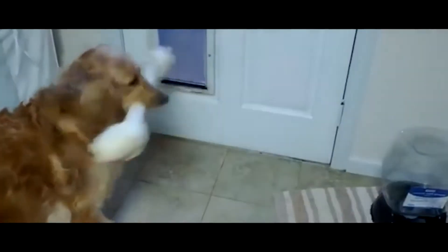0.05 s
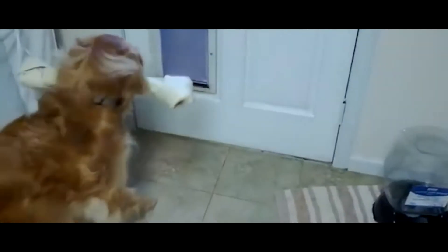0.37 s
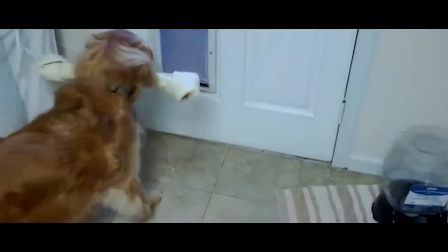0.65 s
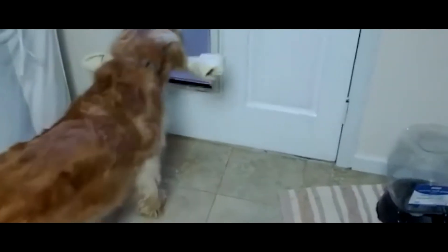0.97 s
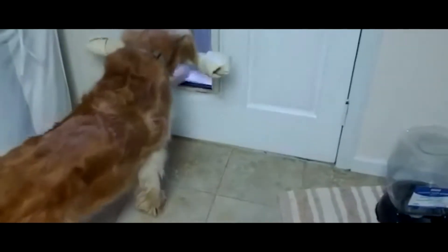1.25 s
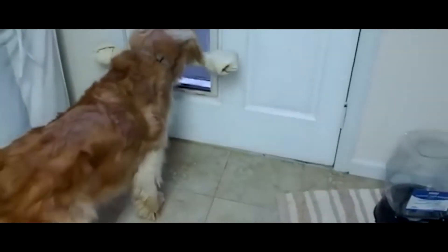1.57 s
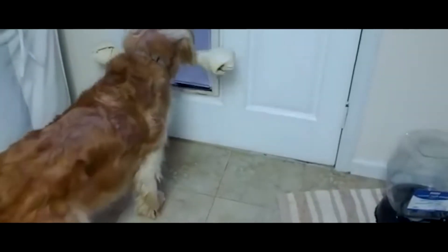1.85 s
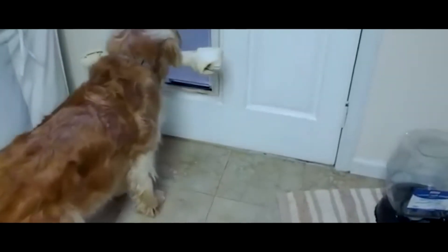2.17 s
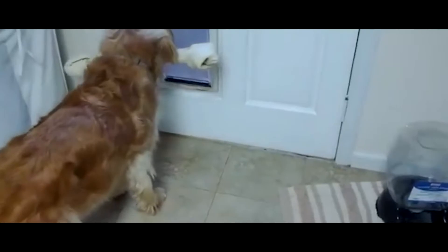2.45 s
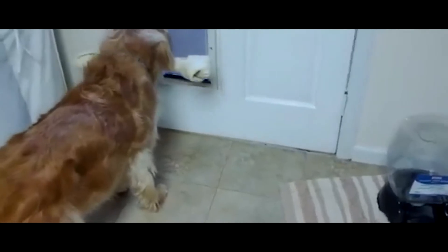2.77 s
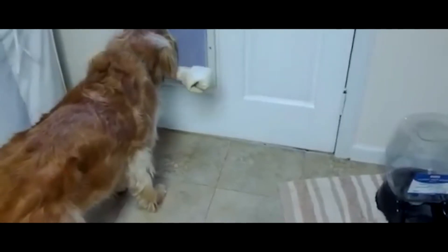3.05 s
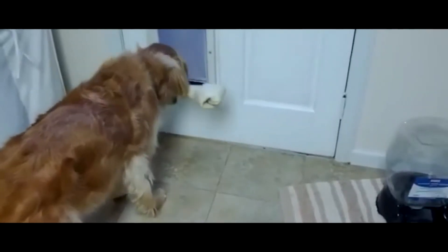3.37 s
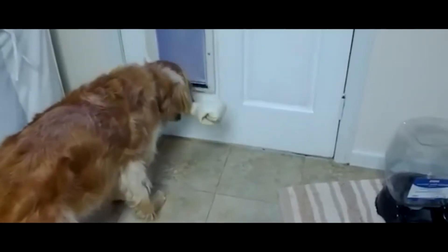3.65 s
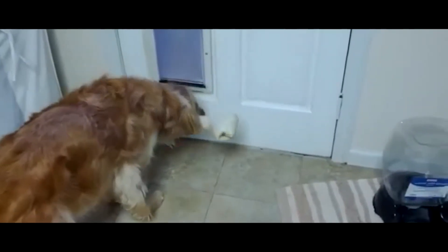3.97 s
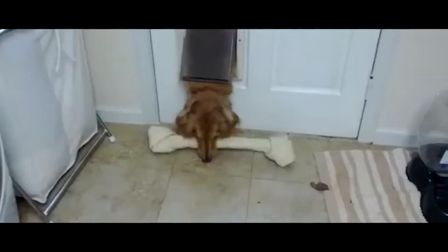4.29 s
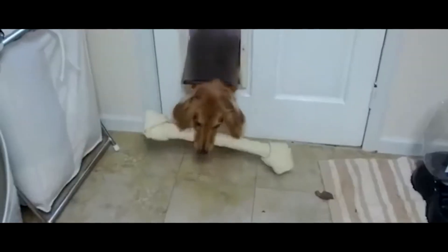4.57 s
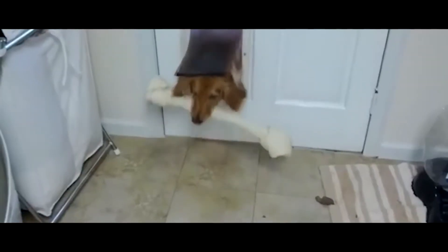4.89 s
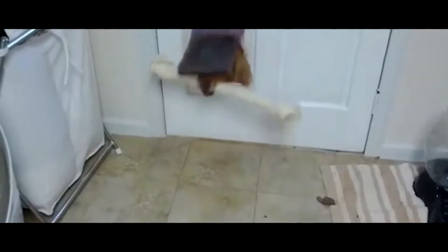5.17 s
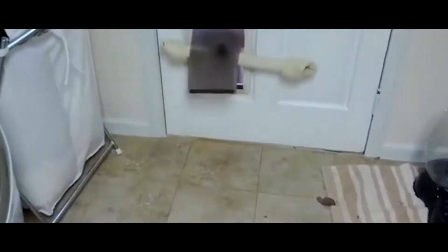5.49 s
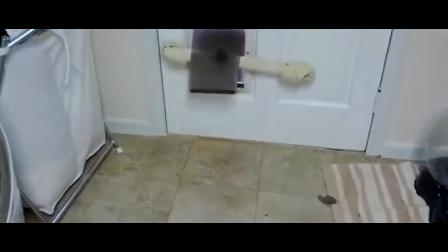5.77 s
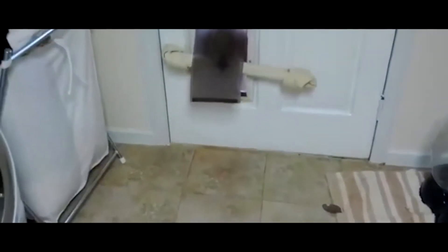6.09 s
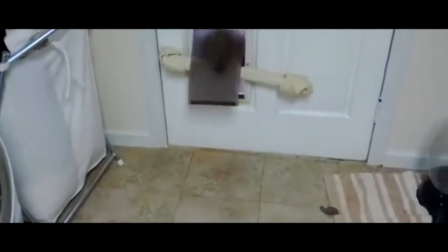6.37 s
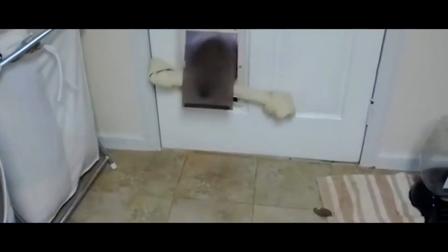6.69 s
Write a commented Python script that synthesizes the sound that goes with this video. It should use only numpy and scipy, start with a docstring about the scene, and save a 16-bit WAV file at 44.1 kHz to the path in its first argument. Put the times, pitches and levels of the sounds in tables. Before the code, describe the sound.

Light knocks, flap crinkles and claw ticks as a dog takes a bone through a pet door, then the bone bangs hard against the door.

```python
"""Dog with a bone at a pet door

A dog with a long chew bone in its mouth tries to get through a pet door in a small tiled room.
The plastic flap buckles and rustles. The bone knocks on the hollow door, exciting its modes, scrapes
along it by stick-slip friction and finally slams across the opening. Claws tick on the tiles and
metal collar tags ring over a quiet household rumble."""
import sys
import numpy as np
from scipy import signal
from scipy.fft import rfft, irfft, next_fast_len
from scipy.io import wavfile

SR = 44100
rng = np.random.default_rng(int(sys.argv[2]) if len(sys.argv) > 2 else 0)


def generate_wav(sig):
    """Save sig (samples, or channels by samples) to the path in sys.argv[1] as 16-bit PCM at SR."""
    pcm = np.round(np.clip(np.atleast_2d(sig).T, -1, 1) * 32767).astype(np.int16)
    wavfile.write(sys.argv[1], SR, pcm)


N = 296793
TIME = np.arange(N) / SR
AGE = TIME[:SR * 9 // 20]  # t/s since the onset of one event


def undb(db):
    """Amplitude ratio of a level in decibels."""
    return 10 ** (np.asarray(db) / 20)


def unit(x):
    """Normalisation to rms 1."""
    return x / np.sqrt(np.mean(x ** 2))


def struck(x):
    """Normalisation of a transient to rms 1 over its first 20 ms."""
    return x / np.sqrt(np.mean(x[:SR // 50] ** 2))


def fade(t60):
    """Exponential decay, 60 dB in t60 seconds."""
    return np.exp(-np.log(1000) * AGE / t60)


def onset(rise):
    """Linear growth to 1 in rise seconds."""
    return np.minimum(AGE / rise, 1)


def swell(rise, t60):
    """Linear growth followed by exponential decay."""
    return np.interp(AGE - rise, AGE, fade(t60)) * onset(rise)


def after(s, t60):
    """Delayed decay over the whole scene: 1 until time s, then 60 dB down every t60 seconds."""
    return np.exp(-np.log(1000) * np.maximum(TIME - s, 0) / t60)


def band(x, hz, q):
    """A two-pole resonance of quality factor q."""
    return signal.lfilter(*signal.iirpeak(hz, q, fs=SR), x)


def steep_band(x, hz, q):
    """Two equal resonances in cascade."""
    return band(band(x, hz, q), hz, q)


def colour(x, points):
    """Spectral shaping by (f/Hz, level/dB) points, to rms 1."""
    hz, db = np.transpose(points)
    size = next_fast_len(len(x))
    f = np.maximum(np.fft.rfftfreq(size, 1 / SR), 1)
    gain = undb(np.interp(np.log(f), np.log(hz), db))
    return unit(irfft(rfft(x, size) * gain, size)[:len(x)])


def burst(points, t60):
    """Modal overlap: many close modes merge into decaying coloured noise."""
    return struck(colour(rng.standard_normal(len(AGE)), points) * fade(t60))


def ring(modes, scatter_db, detune):
    """Free vibration: damped modes, neighbours in opposite phase, level and tuning varied at random."""
    out = np.zeros(len(AGE))
    for k, (hz, db, t60) in enumerate(modes):
        level_draw, pitch_draw = rng.standard_normal(2)
        tone = np.sin(2 * np.pi * hz * (1 + detune * pitch_draw) * AGE)
        out += (-1) ** k * undb(db + scatter_db * level_draw) * fade(t60) * tone
    return struck(out)


def slips(size, per_s, spread_db):
    """Stick-slip as a Poisson train of unequal clicks; a negative spread skews them weaker."""
    strength = undb(spread_db * np.minimum(rng.exponential(size=size), 4))
    return (rng.random(size) < per_s / SR) * strength * rng.standard_normal(size)


def add(out, s, x):
    """Superposition of x on out from time s."""
    i = int(s * SR)
    out[i:i + len(x)] += x[:N - i]


# Spectrum of the household rumble: f/Hz, level/dB
RUMBLE_SPECTRUM = [(12, -27.5), (20, 15.5), (32, -15.5), (63, 1.5), (81, -10), (187, -4), (210, -12.5),
                   (293, -11.5), (485, -21.5), (642, -22), (1060, -28), (1220, -28), (3340, -36),
                   (13900, -37), (16000, -68)]

def house():
    """Stationary noise: a broad low rumble and the faint narrow-band whine of an appliance."""
    whine = unit(steep_band(rng.standard_normal(N), 652, q=8.3))
    rumble = colour(rng.standard_normal(N), RUMBLE_SPECTRUM)
    return undb(-51) * rumble + undb(-68) * whine


def shudder():
    """Energy storage: each blow feeds the door and the swinging flap, and damping drains them."""
    power = np.full(N, undb(-58) ** 2)  # at rest
    door, swing = after(0, t60=1.08) ** 2, after(0, t60=16) ** 2
    for s, db, _ in DOOR_BLOWS:
        add(power, s, undb(db - 28) ** 2 * door + undb(thud_level(db) - 30.5) ** 2 * swing)
    spectrum = [(15, 0), (35, 2.5), (72, 0), (120, -2), (200, -2), (330, -18.5), (900, -34)]
    return np.sqrt(power) * colour(rng.standard_normal(N), spectrum)


def thud_level(db):
    """Compressive growth: the thud gains less than the blow, so light bumps are mostly thud."""
    return -16.5 + 0.63 * db


# Blows on the door, by the bone except the last, low one, where the flap falls back: t/s, level/dB, centre of
# the struck spot's response f/Hz
DOOR_BLOWS = [(.765, -57, 3000), (0.906, -56, 1080), (1.271, -33.5, 1490), (1.389, -36.5, 1940),
              (1.453, -40, 2140), (1.76, -39, 1820), (2.589, -61, 1500), (2.648, -59.5, 1060),
              (3.083, -21.5, 996), (3.184, -41, 804), (3.322, -50, 600), (3.415, -49.5, 1260),
              (3.605, -56, 1210), (3.688, -55.5, 1410), (3.742, -49.5, 3370), (3.744, -35, 386),
              (4.069, -46.5, 500), (4.141, -55.5, 600), (4.318, -50, 1860), (4.346, -45, 3400),
              (4.423, -44.5, 3450), (4.444, -40, 2250), (5.485, -20.5, 990), (5.487, -27.5, 2480),
              (5.492, -25, 252), (5.506, -4.5, 560), (5.5094, -16.5, 1950), (5.526, -17.5, 400),
              (5.556, -28, 495), (5.62, -42, 210)]
# Modes of door panel and bone together: f/Hz, level/dB, T60/s
DOOR_MODES = [(107, 8.5, 0.25), (215.6, 7, 0.16), (289, 3, 0.25), (363, 0, 0.2), (423, -11, 0.17),
              (503, 5, 0.21), (575, 2, 0.14), (618, -12.5, 0.18), (654, 1.5, 0.092), (710, -24, 0.16),
              (755, -1.5, 0.13), (820, 1, 0.13), (849, -9.5, 0.16), (922, 2.5, 0.15), (1005, -4.5, 0.16),
              (1062, -0.5, 0.058), (1238, -0.5, 0.11), (1515, -4.5, 0.093), (1670, -12, 0.13),
              (1960, -3, 0.095), (2040, -1, 0.13), (2290, -3, 0.1), (2913, -6.5, 0.09), (3520, -11, .08),
              (3230, -9.5, 0.056)]
# Spectra of the wood's dense modes, the thud and the crack: f/Hz, level/dB
WOOD_SPECTRUM = [(150, -21.5), (300, -14.5), (550, 11.5), (1000, 3.5), (1400, 2), (2200, -10.5),
                 (3500, -2.5), (4500, -25), (8000, -20.5)]
THUD_SPECTRUM = [(20, 9), (70, -2.5), (300, 2), (420, 0), (900, -39)]
CRACK_SPECTRUM = [(700, 6), (2000, 9.5), (3400, 6.5), (5500, 0), (10000, -1), (13000, -8), (16000, -20)]

def bone_knocks():
    """Impact excitation: each spot favours its own modes; stiff spots crack, yielding ones boom."""
    out = np.zeros(N)
    for s, db, centre_hz in DOOR_BLOWS:
        wood = ring(DOOR_MODES, scatter_db=2.8, detune=0.0017)
        wood += undb(-6) * burst(WOOD_SPECTRUM, t60=0.18)
        wood = struck(band(band(wood, centre_hz, q=1.4), centre_hz, q=0.3))
        spot_note = struck(np.sin(2 * np.pi * centre_hz * AGE) * fade(0.026))
        wood = struck(wood + undb(-5) * spot_note)
        add(out, s, undb(db) * wood)

        thud_hz = 180 + 170 * undb(db)  # harder blows raise the pitch
        thud = struck(steep_band(burst(THUD_SPECTRUM, t60=0.22), thud_hz, q=0.76))
        add(out, s, undb(thud_level(db)) * thud)

        stiffness = np.log2(centre_hz / 1000)  # octaves above a middling spot
        boom = unit(steep_band(rng.standard_normal(len(AGE)), 79.6, q=0.8))
        add(out, s, undb(db - 16.5 - 6.5 * stiffness) * boom * swell(rise=0.016, t60=0.34))
        crack = struck(burst(CRACK_SPECTRUM, t60=0.15) + undb(-8) * burst(CRACK_SPECTRUM, t60=0.063))
        add(out, s, undb(db - 8 + 7 * stiffness) * crack * onset(0.0022))
    return out


# Claws and other small hard contacts: t/s, level/dB
CLAW_TAPS = [(0.807, -63), (0.869, -59.5), (0.905, -48), (1.333, -30.5), (1.39, -49), (1.404, -43.5),
             (1.535, -49), (1.64, -44), (1.685, -41.5), (1.742, -35.5), (1.837, -50.5), (1.89, -35.5),
             (2.091, -35.5), (4.676, -42.5), (4.717, -47.5), (4.828, -57.5), (4.918, -47), (5.174, -43.5),
             (5.412, -39), (5.695, -39.5), (5.749, -49), (5.947, -32.5), (6.086, -42.5), (6.175, -45)]
# Spectrum of a tap: f/Hz, level/dB
TAP_SPECTRUM = [(800, 4), (2800, 4), (5000, -3), (8000, 0.5), (11000, 0), (14000, -9.5), (16000, -20.5)]

def claw_ticks():
    """Impulse and reverberation: a tap, then its wash between tiles and walls; light taps are thinner."""
    out = np.zeros(N)
    light_tap_db, octaves_per_db = -36, 0.57
    for s, db in CLAW_TAPS:
        edge_hz = 7050 * 2 ** (-octaves_per_db * max(db - light_tap_db, 0))
        high_pass = signal.butter(2, edge_hz, "high", fs=SR)
        wash = burst(TAP_SPECTRUM, t60=0.18) * onset(0.0044)
        tap = burst(TAP_SPECTRUM, t60=0.018) * onset(0.0004)
        add(out, s, undb(db) * struck(signal.lfilter(*high_pass, tap + undb(3.5) * wash)))
    return out


# Pushes of the dog's nose: t/s, level/dB, rise t/s, pumped air level/dB, note of the bent sheet f/Hz
FLAP_PUSHES = [(1.27, -32.5, 0.005, -32, 1420), (1.324, -34.5, .012, -45, 1990),
               (1.391, -37, .018, -47, 2120), (1.452, -46, 0.0068, -55, 2040),
               (1.504, -42, 0.0017, -60, 2730), (1.623, -34.5, 0.0086, -36, 1900),
               (1.67, -33.5, 0.019, -29, 865), (1.739, -35, 0.0032, -51, 1660),
               (1.866, -24, 0.027, -54, 1394), (1.912, -28.5, 0.0023, -31.5, 1940)]
# Spectra of the crinkling plastic and the pumped air: f/Hz, level/dB
CRINKLE_SPECTRUM = [(88, -42), (150, -12), (280, -0.5), (383, -11), (566, -3), (745, -7.5), (1360, -8.5),
                    (1600, -6), (4760, -17), (5250, -20.5), (9080, -20), (14200, -27.5), (16000, -49)]
AIR_SPECTRUM = [(15, 1), (35, 3.5), (75, -8.5), (130, -13), (250, -10), (600, -49)]

def flap_rustle():
    """Buckling: the plastic sheet crinkles, resonates at a note set by its bend and pumps a little air."""
    out = np.zeros(N)
    medium_push_db, halving_db = -33.5, 12
    for s, db, rise, air_db, note_hz in FLAP_PUSHES:
        t60 = 0.21 * 2 ** ((medium_push_db - db) / halving_db)  # a hard buckle snaps through sooner
        push = swell(rise, t60)
        crinkle = colour(slips(len(AGE), per_s=2400, spread_db=1.4), CRINKLE_SPECTRUM)
        note = unit(steep_band(crinkle, note_hz, q=10))
        air = colour(rng.standard_normal(len(AGE)), AIR_SPECTRUM) * push ** 0.35
        add(out, s, undb(db) * (crinkle + undb(-12) * note) * push + undb(air_db) * air)
    return out


# Brief slides of bone on frame and collar on flap: t/s, level/dB, rise t/s, T60/s, f/Hz, Q
SLIDES = [(2.426, -53, 0.054, 0.17, 2550, 2.2), (4.925, -44.5, 0.0043, 0.31, 9450, 1.5),
          (4.969, -50.5, 0.045, 0.35, 9400, 0.69), (5.165, -46.5, 0.008, 0.81, 9400, 0.56),
          (5.955, -41.5, 0.013, 0.32, 5570, 4.2), (6.192, -52.5, 0.029, 0.36, 1760, 1.5),
          (6.305, -55, 0.0079, 0.078, 2640, 2.6)]

def scuffs():
    """Frictional excitation: the slips of each slide drive a single resonance."""
    out = np.zeros(N)
    for s, db, rise, t60, hz, q in SLIDES:
        rub = slips(len(AGE), per_s=11000, spread_db=-2.5)
        add(out, s, undb(db) * unit(steep_band(rub, hz, q)) * swell(rise, t60))
    return out


# Strokes of the bone along the door: start t/s, duration t/s, final level/dB
BONE_STROKES = [(2.427, 0.062, -58.5), (3.245, 0.28, -53.5), (3.787, 0.16, -61), (5.576, .15, -56.5),
                (5.922, 0.097, -32), (6.069, 0.097, -47), (6.175, 0.15, -53), (6.349, 0.043, -51),
                (6.559, .15, -46.5)]
# Spectrum of the rubbing: f/Hz, level/dB
RUB_SPECTRUM = [(120, -69), (200, -2.5), (318, -12.5), (532, -0.5), (759, -12.5), (1160, -16), (1360, -17),
                (2280, -17.5), (4570, -27.5), (5760, -40), (6400, -32), (10300, -27.5), (14000, -44)]

def bone_scrape():
    """Stick-slip friction: the bone moves in tiny jerks that drive the hollow panel's resonances."""
    rub = colour(slips(N, per_s=3500, spread_db=0.5), RUB_SPECTRUM)
    panel = unit(band(rub, 552, q=17) + undb(-2) * band(rub, 720, q=10) + undb(8) * band(rub, 946, q=8.7))
    gain = np.zeros(N)
    build_db = 7  # each stroke presses harder until it lets go
    for s, length, db in BONE_STROKES:
        catch = np.clip((TIME - s) / 0.034, 0, 1)
        to_go = np.clip(1 - (TIME - s) / length, 0, 1)
        gain += undb(db - build_db * to_go) * catch * after(s + length, t60=0.22)
    return (rub + undb(-8) * panel) * gain


# Collisions of the two collar tags: t/s, first tag level/dB, second tag level/dB
TAG_COLLISIONS = [(4.316, -43.5, -60), (4.331, -34, -47), (4.589, -47, -53), (4.606, -42, -43.5),
                  (4.715, -46.5, -47.5), (5.353, -66, -38), (5.493, -36, -37.5), (5.832, -59, -66),
                  (5.901, -69, -52), (6.075, -54, -62), (6.147, -47, -47), (6.158, -42, -49)]
# Modes of each tag: f/Hz, level/dB, T60/s
FIRST_TAG_MODES = [(6880, -23, .08), (10120, 3, 0.19), (10200, -3, .11), (10270, -2.5, .17),
                   (11600, -7.5, 0.11), (11615, -5, .15), (12400, -23, .1), (14580, -9.5, .09),
                   (14680, -10, .11)]
SECOND_TAG_MODES = [(6140, -16.5, .08), (6260, -16.5, .08), (6400, -24.5, .08), (7850, -27, .1),
                    (11000, -14, .09), (11220, -0.5, 0.22), (15000, -16.5, 0.089), (15160, -21, .13)]

def collar_tags():
    """Plate vibration: two small metal tags touch with a click and ring in very high modes."""
    out = np.zeros(N)
    for s, first_db, second_db in TAG_COLLISIONS:
        first = undb(first_db) * ring(FIRST_TAG_MODES, scatter_db=4.5, detune=0.0013)
        second = undb(second_db) * ring(SECOND_TAG_MODES, scatter_db=4.5, detune=0.0013)
        click = burst([(1000, -8.5), (5000, -11.5), (10000, -1.5), (16000, -5.5)], t60=0.073)
        click_db = max(first_db, second_db) - 2.5
        add(out, s, (first + second + undb(click_db) * click) * onset(0.0044))
    return out


def room(x, wet_db, t60):
    """Reverberation: the dense echoes of a small hard room build up and die away."""
    echo = rng.standard_normal(len(AGE)) * fade(t60) * onset(0.066)
    return x + undb(wet_db) * signal.fftconvolve(x, echo / np.linalg.norm(echo))[:N]


# First reflections from tiles, door and side wall: delay t/ms, level/dB
EARLY_ECHOES = [(1.3, -29.5), (2.9, -18), (4.7, -20.5), (7.1, -18.5)]

def reflect(x, edge_hz):
    """Comb filtering: nearby hard surfaces return the short waves, which interfere with the source."""
    bright = signal.sosfilt(signal.butter(2, edge_hz, "high", fs=SR, output="sos"), x)
    out = x.copy()
    for ms, db in EARLY_ECHOES:
        add(out, ms / 1000, undb(db) * bright)
    return out


def scene():
    """Superposition in one channel: blows carry their own tails; the room smears the rubbing sounds."""
    rubbing = room(flap_rustle() + bone_scrape() + scuffs(), wet_db=-7.5, t60=0.11)
    contacts = reflect(bone_knocks() + claw_ticks() + rubbing, edge_hz=870)
    return (undb(-2) * contacts + collar_tags() + house() + shudder())[None]


def record(dry):
    """Saturation and band limiting: the microphone rounds off the slam and cuts the highest treble."""
    rounded = dry / (1 + dry ** 4) ** 0.25
    low_pass = signal.ellip(8, 0.2, 80, 15450, fs=SR, output="sos")
    return signal.sosfilt(low_pass, rounded)


dry = scene()
out = record(dry)
generate_wav(out)
```